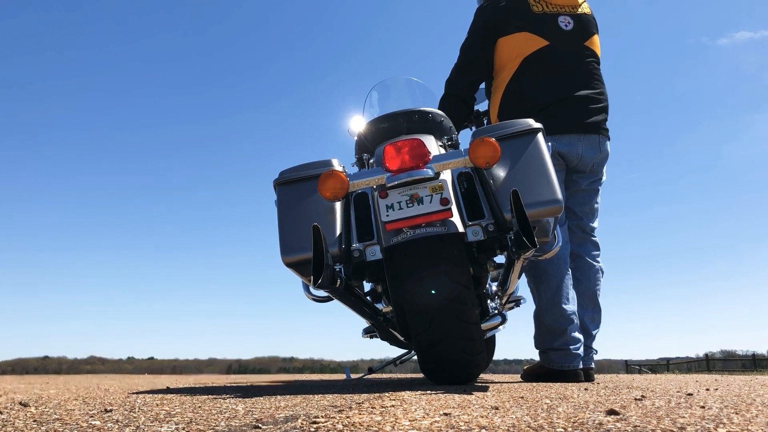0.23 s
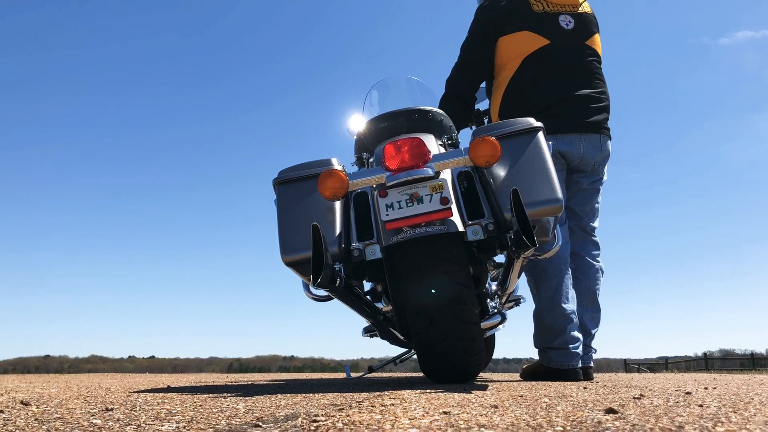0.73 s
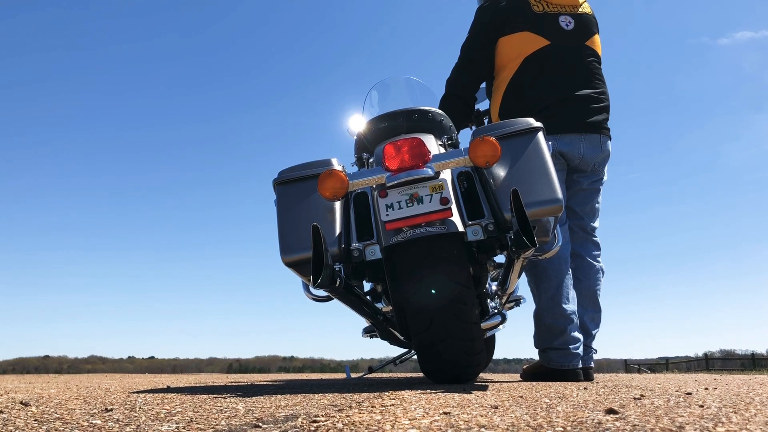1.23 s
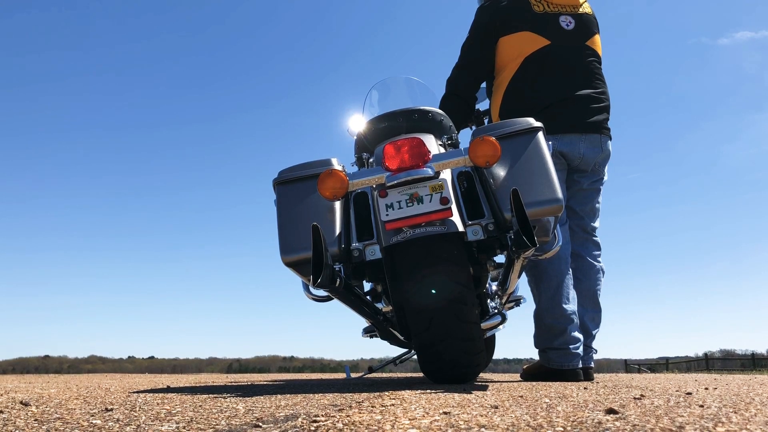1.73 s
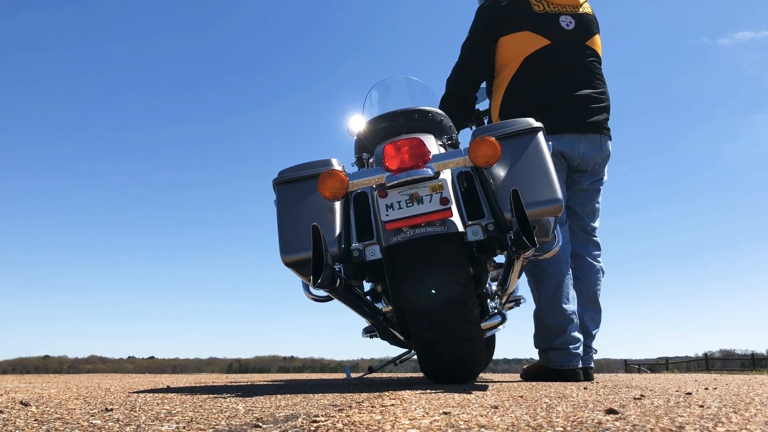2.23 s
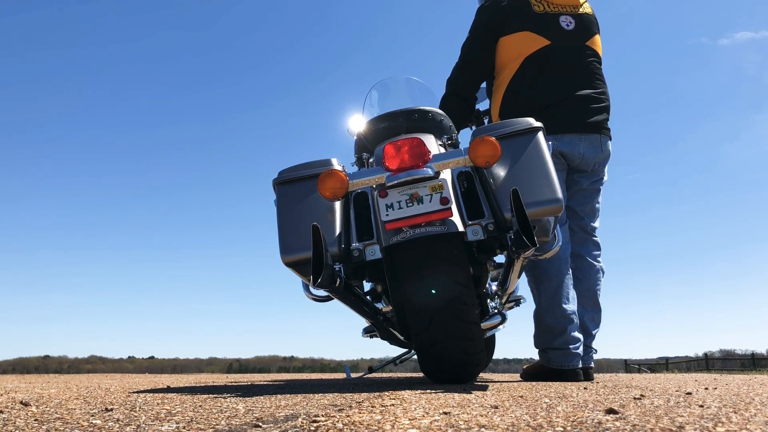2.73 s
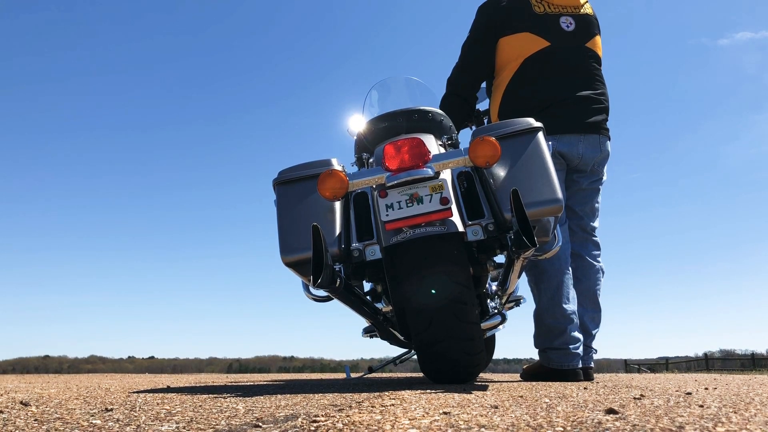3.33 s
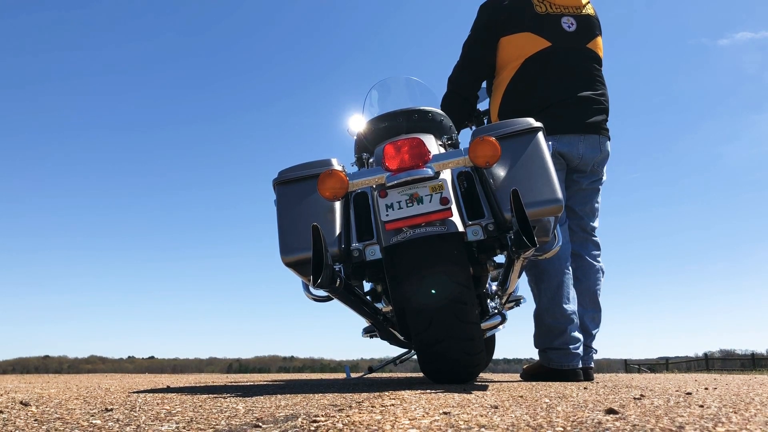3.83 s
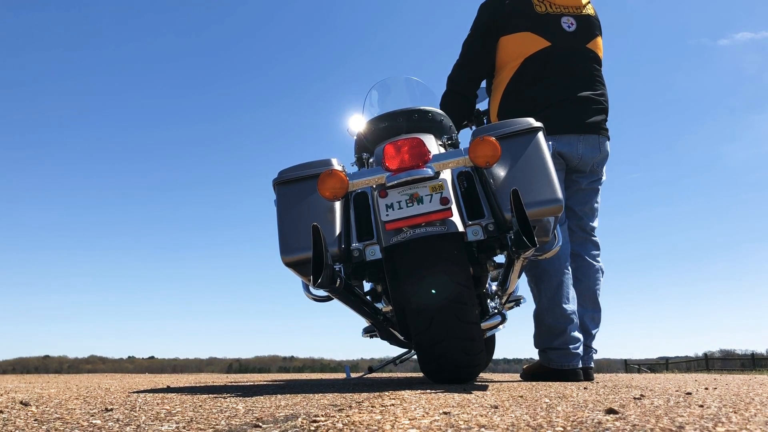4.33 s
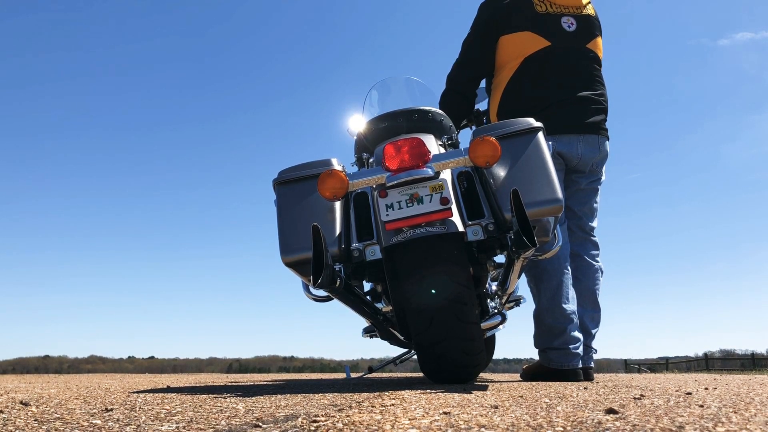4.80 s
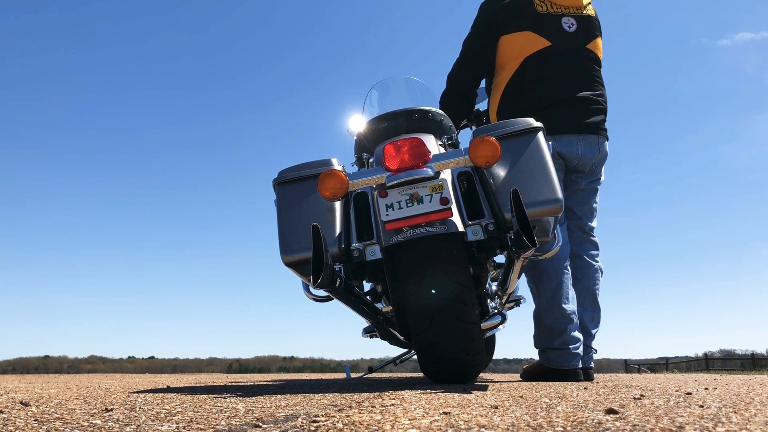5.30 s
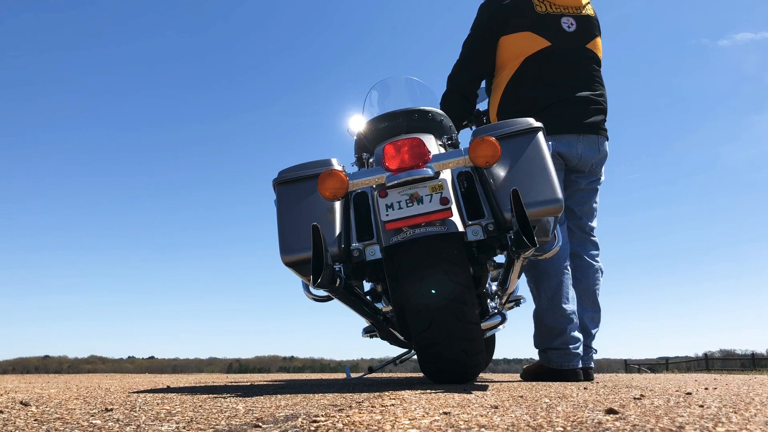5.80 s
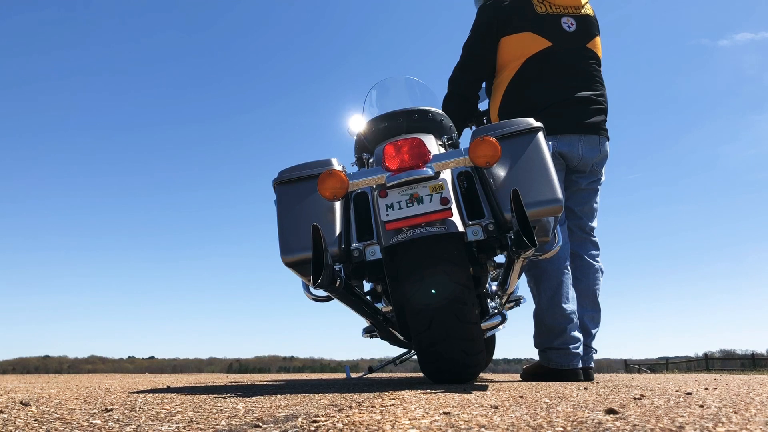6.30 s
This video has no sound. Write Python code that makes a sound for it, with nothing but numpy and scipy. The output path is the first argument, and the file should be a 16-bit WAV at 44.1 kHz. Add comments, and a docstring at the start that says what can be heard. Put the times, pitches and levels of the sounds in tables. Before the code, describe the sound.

A V-twin motorcycle stands in an open lot, heard close behind its loud, open exhaust, with little echo. At 0 s it is already running fast and sagging slightly. Around 0.15 s the throttle snaps open and the engine surges to a rough, raspy peak near 0.45 s. The throttle shuts and the growling pitch slides down steadily, individual barks separating. From about 1.4 to 2.0 s sharp dry pops crackle in the pipe, strongest before 1.55 s, fading as it slows. From 1.75 to 2.7 s it nearly stalls: weak, slack puffs, soft breathy gas rushes, low rumble. Near 2.8 s a few strong firings catch, and a deep loping idle continues to 6.55 s, about eight uneven cycles per second, with thumps, hollow knocks, spitting hiss and faint valve rustle. A weaker firing or two slips by near 4.05 s and 5.95 s. Automatic level control ducks the rev, then slowly lifts the quieter sound.

```python
"""V-twin motorcycle: blip, overrun, idle

Heard close behind the open exhaust. Speed sags, a throttle blip revs the engine, it coasts down popping
almost to a stall, then catches into a loping idle. Each cycle sends four puffs down the pipes: each thumps
the gas column, barks at the outlet and tears into hiss. Gliding tones growl when revved; soft gas rushes
and valve rustle join in. Gain control ducks under the rev, then slowly lets the level back up.
"""
import sys
import numpy as np
from scipy import signal
from scipy.fft import rfft, irfft, next_fast_len
from scipy.io import wavfile
from scipy.ndimage import uniform_filter1d

SR = 44100
rng = np.random.default_rng(int(sys.argv[2]) if len(sys.argv) > 2 else 0)


def int16_out(signal):
    """Quantize to a 16-bit WAV file."""
    q = np.round(np.clip(np.atleast_2d(signal).T, -1, 1) * 32767)
    wavfile.write(sys.argv[1], SR, q.astype(np.int16))


N = 288855
T = np.arange(N) / SR

# Engine speed: (time [s], four-stroke rate [cycles/s])
SPEED = [(0.0, 24.4), (0.13, 23.4), (0.2, 27.3), (0.3, 33.8), (0.4, 42.5), (0.45, 45.2), (0.52, 43.6),
         (0.63, 38.7), (1.0, 31.1), (1.3, 25.5), (1.85, 15.4), (2.5, 8.242), (2.95, 7.781), (3.03, 8.106),
         (4.03, 8.112), (4.04, 7.838), (4.51, 7.52), (5.16, 7.819), (5.6, 7.399), (5.72, 7.746),
         (6.55, 7.724)]
START_CYCLE = -.30
# Throttle: starts to open, starts to close, is shut; opening time
OPEN_S, CLOSING_S, SHUT_S, SNAP_S = .145, 0.332, 0.44, 0.018
# Idle has caught at CATCH_S, after a fade of CATCH_LENGTH_S; it starts weak, full level at SETTLED_S
CATCH_S, CATCH_LENGTH_S = 2.785, 0.078
WEAK_IDLE_DB, SETTLED_S = -1.5, 5.55
# Throttle shut: coasting pattern turns to spinning; firings begin to starve, are fully starved
COAST_CPS, SPIN_CPS, STARVING_CPS, STARVED_CPS = 17, 39, 16.2, 13.1

# Puffs of one cycle, per engine state, before scatter and starved stretch:
# (crest place [cycles], rise [cycles], thump [dB], bark [dB], hiss [dB])
IDLING_PUFFS = [(-.015, 0.041, -6.5, 8, 3), (.255, 0.036, -9, -14, -20), (.412, .034, -3, 6.5, -1),
                (.78, 0.03605, -3, 0, -6.5)]
COASTING_PUFFS = [(-.10, 0.012, -2, -4.5, -1.5), (.2, .03, -15.5, -15, -11), (.26, .012, -3, -0.5, 10),
                  (.57, 0.012, -2, -1, 10)]
SPINNING_PUFFS = [(-.51, 0.034, 4, 8, 0.3), (-.13, 0.028, 16, 4, -0.18), (.09, 0.03, -3.5, 10, -0.62),
                  (.37, 0.015, -3, 4, 0.98)]
PULLING_PUFFS = [(-.40, 0.05, 5, -15, -8), (-.21, 0.041, 3, 11, 14.5), (.23, 0.0406, 1, 11, 12.5),
                 (.42, 0.018, -31, -13, -28)]
# Rich and lean firings, added to the nearest puff: (crest time [s], level change [dB])
ODD_FIRINGS = [(.148, -2.5), (.183, -1.5), (.221, -8), (2.79, 9.5), (2.85, 0), (2.92, 4.5), (4.028, -9.5),
               (4.083, -6), (5.915, -12.5), (5.987, -33)]
# Strength scatter at idle and revved: (thump [dB], bark [dB], hiss [dB])
IDLE_SCATTER_DB, REV_SCATTER_DB = (1.2, 1.8, 2.2), (2.5, 2, 2)

# Exhaust level against speed: (rate [cycles/s], thump [dB], bark [dB], hiss [dB])
LOUDNESS = [(8.25, -18.5, -23.5, -33), (11.2, -15.5, -19.5, -25.5), (16.46, -2, -10.5, -30),
            (20, -5, -4, -14.5), (25.56, -1, 2.5, -6.5), (28.3, 1, 5, 1), (41.4, 3, 9.5, 4)]
# Level change, throttle open: (thump [dB], bark [dB], hiss [dB])
THROTTLE_DB = (-2, 0.4, -0.5)
# Level change, starved: (thump [dB], bark [dB], hiss [dB])
STARVED_DB = (-3.5, -4.5, -11.5)

# Valve rustle in each cycle: (place [cycles], length [cycles], level [dB])
VALVES = [(.21, 0.082, -44.5), (.61, 0.092, -46.5)]
# Valve rustle colour: (frequency [Hz], density [dB per Hz])
VALVE_COLOUR = [(1000, -1), (1800, 8.5), (3500, -6), (6000, 6.5), (9000, -24), (15000, -20)]
# Gas rushes near stall: (start [s], end [s], level [dB]); fade time
RUSHES, RUSH_EDGE_S = [(1.75, 2.037, -27.5), (2.13, 2.21, -31)], 0.029

# Afterfire pops on the overrun: (time [s], relative level [dB])
POPS = [(1.402, -2), (1.4267, -3), (1.446, 5), (1.49, 5), (1.5034, -1), (1.518, 5), (1.5365, -2),
        (1.5522, -4), (1.5849, -6), (1.6007, -6), (1.634, -10), (1.6514, -7), (1.6672, 1), (1.6882, -10),
        (1.705, -1), (1.7448, -7), (1.805, -3), (1.8243, 0), (1.8662, -16), (1.8876, -2), (1.9331, -12),
        (1.9476, -9), (2.0049, -8), (2.035, -17)]
# Pop colour: (frequency [Hz], density [dB per Hz])
POP_COLOUR = [(300, -9), (700, 7), (1200, 4), (1800, 1), (2600, -17), (4000, -20)]
POPPED_DB = -2.5  # change to bark and hiss of a puff near a pop

# Smooth gas pulsation: (multiple of cycle rate, relative level [dB])
PULSATION = [(3, 6.5), (4, -3.5), (5, 6.5), (6, 1.5), (7, -12), (8, -4), (9, 0.5), (10, -2), (11, -3.5),
             (15, -2.5)]
# Pipe response to the pulsation: (frequency [Hz], gain [dB])
GROWL_RESPONSE = [(55, -8), (95, 1), (120, 0), (148, 4), (165, 1), (200, -5), (260, -3), (310, 0),
                  (400, -2.5), (620, -6)]
# Growl level, added to the thump's loudness: (rate [cycles/s], level [dB])
GROWL_LEVEL = [(10, -18), (13, -5), (16, -3), (23, -1.5), (28, 2), (34, 2.5), (39, -1), (44, -3)]

# Hiss colour: (frequency [Hz], density [dB per Hz])
HISS_COLOUR = [(1500, 5), (2600, 5.5), (4000, -0.5), (5500, -2), (8000, -4.5), (11500, -4), (13000, -7),
               (16000, -6)]
# Whistle of each cylinder's jet: (place [cycles], frequency [Hz], width [Hz], boost [dB])
WHISTLES = [(0, 6380, 2000, 5.5), (.42, 11400, 2510, 8)]
# Rate range over which the rasp gains its edge; the edge: (frequency [Hz], width [Hz], boost [dB])
EDGE_CPS = (30, 44)
RASP_EDGE = [(2700, 310, -8), (4700, 700, -2), (7600, 1800, 5.5), (15500, 4000, -7)]
# Outlet cross modes, before each user's depth: (frequency [Hz], width [Hz], boost [dB])
OUTLET = [(670, 85, 0.5), (1633, 27, 5), (2210, 42, -7), (2890, 180, 6.5), (3110, 270, -7),
          (3570, 300, 6.5), (4080, 340, 6.5), (4680, 470, -2), (6400, 2700, -0.5), (7940, 170, 7.5)]
# Bark colour, slow flow: (frequency [Hz], density [dB per Hz])
SLOW_BARK = [(150, -7.5), (320, -4), (400, -6), (600, -0.5), (810, -4), (1000, -8.5), (1800, -15),
             (2500, -23), (3600, -33)]
# Bark colour, fast flow: (frequency [Hz], density [dB per Hz])
FAST_BARK = [(170, -4.5), (300, -0.5), (600, -0.5), (1000, -2), (1500, -4), (1950, -8), (2500, -17.5),
             (3600, -29)]
# Thump colour, fast flow: (frequency [Hz], density [dB per Hz])
FAST_THUMP = [(25, -60), (45, -2.5), (70, -3), (110, -6.5), (155, -8), (240, -8.5), (320, -15.5),
              (500, -29.5)]
# Gas column resonances at idle, each swelling once per cycle:
# (frequency [Hz], width [Hz], relative level [dB], outlet polarity, swell place [cycles], swell depth [dB])
PIPE = [(62.6, 6.1, 1, 1, 1, 2.5), (104, 32, -21.5, -1, 0.19, 22.5), (129.3, 5.7, -12, -1, 0.57, 12),
        (164.6, 6.1, -10.5, -1, 0.059, 7.5), (221.8, 7.2, -17.5, 1, 0.42, 11),
        (316.3, 7.3, -17.5, 1, 0.78, 4)]
# Pipe resonances in hot fast flow: (frequency [Hz], width [Hz], boost [dB])
HOT_PIPE = [(159, 25, 6), (327, 46, 7)]

# Gain control: mean-level ceiling, recovery slope; band limit
LIMIT_DB, RECOVERY_DB_PER_S, EDGE_HZ = -10, 5.5, 16050


def amp(db):
    """Decibels to gain."""
    return 10 ** (np.asarray(db) / 20)


def curve(rows, t=T, axis=1):
    """One table column, linearly interpolated."""
    rows = np.asarray(rows, float)
    return np.interp(t, rows[:, 0], rows[:, axis])


def ramp(x, start, end):
    """Goes from 0 to 1 between two values."""
    return np.clip((x - start) / (end - start), 0, 1)


def drift(count):
    """Slow random curve through unit-variance knots."""
    return np.interp(T, np.linspace(0, T[-1], count), rng.standard_normal(count))


def add(mix, start_s, sound):
    """Mixes a sound in at a time."""
    part = mix[max(round(start_s * SR), 0):][:len(sound)]
    part += sound[:len(part)]


def steady(x, size=5760):
    """Divides a sound by its running RMS."""
    power = uniform_filter1d(uniform_filter1d(x ** 2, size), size)
    return x / np.sqrt(abs(power) + 1e-12)


def colour(x, points, modes=(), depth=1, size=8192):
    """Minimum-phase filter from a spectrum plus resonant bumps."""
    hz = np.fft.rfftfreq(size, 1 / SR)
    f, level = np.transpose(points)
    db = np.interp(np.log(hz + 1), np.log(f), level)
    # 20 dB per octave beyond the end points
    db -= 20 * np.log2(np.maximum(hz / f[-1], 1) * np.maximum(f[0] / (hz + 1), 1))
    db += depth * sum(boost / (1 + (2 * (hz - centre) / width) ** 2) for centre, width, boost in modes)
    log_gain = np.log(amp(np.maximum(db, -90)))
    circle = np.r_[log_gain, log_gain[-2:0:-1]]
    taps = np.fft.ifft(np.exp(np.conj(signal.hilbert(circle)))).real
    return signal.oaconvolve(x, taps[:size // 2])[:N]


def disperse(x, delay_s, hz):
    """Low tones leave the pipe later than high ones, so sounds drop in pitch."""
    size = next_fast_len(N + SR // 10)
    f = np.fft.rfftfreq(size, 1 / SR)
    shift = np.exp(-2j * np.pi * delay_s * hz * (1 - np.exp(-f / hz)))
    return irfft(rfft(x, size) * shift, size)[:N]


def crank():
    """Engine cycles completed: the integral of speed."""
    return START_CYCLE + np.cumsum(curve(SPEED)) / SR


def throttle(t):
    """Snapped open, then rolled shut."""
    return ramp(t, OPEN_S, OPEN_S + SNAP_S) - ramp(t, CLOSING_S, SHUT_S)


def idling(t):
    """1 once the idle has caught."""
    return ramp(t, CATCH_S - CATCH_LENGTH_S, CATCH_S)


def slackness(t=T, at_idle=0.057):
    """Starved firings go slack as the engine slows, until the idle catches."""
    starved = ramp(curve(SPEED, t), STARVING_CPS, STARVED_CPS)
    return starved * (1 - (1 - at_idle) * idling(t))


def loudness(axis):
    """Voice level in dB (1 thump, 2 bark, 3 hiss): speed, throttle, starvation, weak idle start."""
    speed_db = curve(LOUDNESS, curve(SPEED), axis)
    throttle_db = THROTTLE_DB[axis - 1] * throttle(T)
    starved_db = STARVED_DB[axis - 1] * slackness()
    weak_db = WEAK_IDLE_DB * idling(T) * ramp(T, SETTLED_S, CATCH_S)
    return speed_db + throttle_db + starved_db + weak_db


def churning(calm_db=-3.5, pulling_db=-4):
    """Eddy level in dB: lower at moderate speed and with the throttle open, so puffs stand apart."""
    return calm_db * (1 - ramp(curve(SPEED), 28.0, 32.7)) + pulling_db * throttle(T)


def pattern(when, slot):
    """Puff rows: speed, throttle and idle blend the four patterns in turn."""
    rows = np.array(COASTING_PUFFS)[slot]
    spinning = ramp(curve(SPEED, when), COAST_CPS, SPIN_CPS)
    blends = (SPINNING_PUFFS, spinning), (PULLING_PUFFS, throttle(when)), (IDLING_PUFFS, idling(when))
    for table, share in blends:
        rows = rows + share[:, None] * (np.array(table)[slot] - rows)
    return rows


def puffs(slack_scatter_db=5.0, idle_jitter=0.0023, rev_jitter=0.0057, stretch=1.8):
    """Onset s, rise s and three gains per puff; timing (jitter in cycles) and strength scatter."""
    turns = crank()
    cycles = np.repeat(np.arange(np.ceil(turns[-1])), len(IDLING_PUFFS))
    slot = np.arange(len(cycles)) % len(IDLING_PUFFS)
    when = np.interp(cycles + slot / len(IDLING_PUFFS), turns, T)
    idle, slack, rows = idling(when), slackness(when), pattern(when, slot)
    luck = rng.standard_normal((len(cycles), 5))

    jitter = luck[:, 0] * np.interp(idle, [0, 1], [rev_jitter, idle_jitter])
    crest = cycles + rows[:, 0] + jitter
    onset = np.interp(crest - rows[:, 1] * (1 + stretch * slack), turns, T)
    crest_s = np.interp(crest, turns, T)
    rise = crest_s - onset

    scatter_db = np.outer(idle, IDLE_SCATTER_DB) + np.outer(1 - idle, REV_SCATTER_DB)
    scatter_db = scatter_db + slack_scatter_db * slack[:, None]
    # half the variance is shared by the three voices
    db = rows[:, 2:] + scatter_db * (luck[:, 1:2] + luck[:, 2:]) / np.sqrt(2)
    for time_s, odd_db in ODD_FIRINGS:
        db[np.argmin(abs(crest_s - time_s))] += odd_db
    for time_s, _ in POPS:
        db[abs(crest_s - time_s) < .007, 1:] += POPPED_DB
    heard = (onset > 0) & (onset < T[-1])
    return onset[heard], rise[heard], *amp(db[heard]).T


def kicks(onset, gain):
    """A one-sample pressure impulse per event."""
    return np.bincount(np.clip(onset * SR, 0, N).astype(int), gain, N + 1)[:N]


def jet(onset, rise, gain, sharp, size=3000):
    """Turbulence: noise that swells and dies with each puff."""
    strength = np.zeros(N + size)
    for start_s, rise_s, g in zip(onset, rise, gain):
        age = np.arange(size) / SR / max(rise_s, 1 / SR)
        strength[int(start_s * SR):][:size] += g * (age * np.exp(1 - age)) ** sharp
    return strength[:N] * rng.standard_normal(N)


def wake(x, wake_db, t30_s):
    """Eddies churn on after each puff: noise falling 30 dB in t30_s."""
    keep = amp(-60 / (abs(t30_s) * SR))
    power = signal.lfilter([1 - keep], [1, -keep], x ** 2)
    return x + amp(wake_db) * np.sqrt(power) * rng.standard_normal(N)


def flow(db, slack_db):
    """Even noise between the puffs, raised when they go slack."""
    return amp(db + slack_db * slackness()) * rng.standard_normal(N)


def by_speed(slow, fast, slow_cps=9, fast_cps=17):
    """Equal-power crossfade from slow-flow to fast-flow sound, levelled."""
    share = ramp(curve(SPEED), slow_cps, fast_cps)
    return steady(np.sqrt(1 - share) * steady(slow) + np.sqrt(share) * steady(fast))


def flutter(x, patchy_db, whistles=()):
    """Random time-frequency patches flicker the colour; jet whistles boost bands once per cycle."""
    hz, t, z = signal.stft(x, SR, nperseg=256)
    patches = uniform_filter1d(rng.standard_normal(z.shape), size=5, axis=0)
    patches = uniform_filter1d(patches, size=9, axis=1)
    db = patchy_db * patches / patches.std()
    turns = np.interp(t, T, crank())
    for place, centre, width, boost in whistles:
        band = np.exp(-((hz - centre) / width) ** 2)
        swell = np.cos(np.pi * (turns - place)) ** 8
        db = db + boost * np.outer(band, swell)
    return signal.istft(z * amp(db), SR)[1][:N]


def valve_gear(uneven_db=3):
    """Rockers and chain: coloured noise rustling softly in two swells per cycle."""
    turns, level = crank(), 0
    for place, length, db in VALVES:
        distance = (turns - place + .5) % 1 - .5
        level = level + amp(db) * np.exp(-(distance / length) ** 2)
    rustle = colour(rng.standard_normal(N), VALVE_COLOUR, OUTLET)
    return level * amp(uneven_db * drift(count=110)) * steady(flutter(rustle, patchy_db=5.5))


def rushes(depth_db=7.5):
    """Soft gas noise near stall, pumped twice per cycle."""
    level = 0
    for start, end, db in RUSHES:
        fade = ramp(T, start, start + RUSH_EDGE_S) * ramp(T, end, end - RUSH_EDGE_S)
        level = level + amp(db) * fade
    pumping = amp(depth_db * np.cos(2 * np.pi * 2 * crank()))
    return level * pumping * steady(colour(rng.standard_normal(N), HISS_COLOUR))


def pops(level_db=24.5, echo_s=0.0037, echo_db=-11, cooled_db=-11, hot_s=1.57, cool_s=1.7):
    """Unburnt fuel pops in the pipe: shock front, brief ring, echo; the front weakens hot_s to cool_s."""
    when, db = np.transpose(POPS)
    shocks = kicks(when, amp(db)) + kicks(when + echo_s, amp(db + echo_db))
    ring = colour(wake(shocks, wake_db=-13, t30_s=0.03), POP_COLOUR)
    ring = disperse(ring, delay_s=0.0017, hz=1200)
    front = colour(wake(shocks, wake_db=6, t30_s=0.008), HISS_COLOUR)
    front = front * amp(-13 + cooled_db * ramp(T, hot_s, cool_s))
    return amp(level_db) * (ring + front)


def growl(waver_db=4.5):
    """Gas pulsation: sines at multiples of the cycle rate, wavering, shaped by pipe resonances."""
    turns, tones = crank(), 0
    for order, db in PULSATION:
        level = amp(db + waver_db * drift(count=40))
        tones = tones + level * np.sin(2 * np.pi * (round(order) * turns + rng.random()))
    level_db = curve(GROWL_LEVEL, curve(SPEED)) + loudness(axis=1)
    return steady(colour(tones, GROWL_RESPONSE)) * amp(level_db)


def hiss(onset, rise, gain):
    """Jet tears at the outlet: spit when slow, rasp when revved, bright edge at top speed."""
    gas = steady(jet(onset, rise, gain, sharp=4.0)) + flow(db=-19.0, slack_db=12)
    spit = colour(wake(gas, wake_db=-14.5, t30_s=0.3), HISS_COLOUR, OUTLET)
    slow = flutter(spit, patchy_db=3.5, whistles=WHISTLES)
    torn = wake(gas, wake_db=1 + churning(), t30_s=0.013)
    edge = ramp(curve(SPEED), *EDGE_CPS)
    plain = colour(torn, HISS_COLOUR, OUTLET, depth=0.043)
    rasp = (1 - edge) * plain + edge * colour(torn, HISS_COLOUR, RASP_EDGE)
    return by_speed(slow, flutter(rasp, patchy_db=1.5)) * amp(loudness(axis=3))


def knocks(onset, gain, hz=745, spread=0.055, swell_s=0.0038, sharp=3.5,
           lead_s=0.0024, echo_s=0.00585, echo_db=-9):
    """Outlet rings hollow for a few periods, pitch varying per puff; the pipe returns an echo."""
    t, out = T[:SR // 40], np.zeros(N + SR)
    swell = (t / swell_s * np.exp(1 - t / swell_s)) ** sharp
    for start_s, g, luck in zip(onset, gain, rng.standard_normal(len(onset))):
        ring = g * swell * np.sin(2 * np.pi * hz * (1 + spread * luck) * (t - lead_s))
        add(out, start_s - lead_s, ring)
        add(out, start_s - lead_s + echo_s, amp(echo_db) * ring)
    return steady(out[:N])


def bark(onset, rise, gain, lag=0.3526, rough_db=1, knock_db=-3.5):
    """Steep wave front (lag in rises) plus rough gas at the outlet; slow puffs also knock."""
    front = steady(kicks(onset + lag * rise, gain))
    rough = amp(rough_db) * steady(jet(onset, rise, gain, sharp=1.0))
    gas = front + rough + flow(db=-7.5, slack_db=7)
    slow = steady(colour(wake(gas, wake_db=-1, t30_s=0.72), SLOW_BARK, OUTLET))
    slow = slow + amp(knock_db) * (1 - slackness()) * knocks(onset, gain)
    fast = colour(wake(gas, wake_db=0.5 + churning(), t30_s=0.027), FAST_BARK, OUTLET, depth=0.2)
    fast = disperse(fast, delay_s=0.003936, hz=809)
    return by_speed(slow, fast) * amp(loudness(axis=2))


def thump(onset, rise, gain, churn_db=-21, rumble_db=-19, top_hz=420, revved_db=-7, level_db=4.0):
    """Kicks ring the gas column; its resonances swell in turn, which makes the lope."""
    churn = steady(jet(onset, 2 * rise, gain, sharp=0.99))
    push = steady(kicks(onset, gain)) + amp(churn_db) * churn
    t, turns, ringing = T[:SR // 2], crank(), np.zeros(N)
    for hz, width, db, side, place, swell_db in PIPE:
        ring = np.sign(side) * np.exp(-np.pi * width * t) * np.cos(2 * np.pi * hz * t)
        swell = amp(db + swell_db * np.cos(2 * np.pi * (turns - place)))
        ringing += signal.oaconvolve(push, ring)[:N] * swell
    soften = signal.butter(4, top_hz, fs=SR, output="sos")
    rumble = steady(colour(rng.standard_normal(N), FAST_THUMP, HOT_PIPE))
    boom = steady(signal.sosfilt(soften, ringing)) + amp(rumble_db) * rumble
    drone = colour(push, FAST_THUMP, HOT_PIPE)
    voice_db = level_db + loudness(axis=1) + revved_db * ramp(curve(SPEED), 13.4, 15.5)
    return by_speed(boom, drone, slow_cps=12.4, fast_cps=30.7) * amp(voice_db)


def scene():
    """Three exhaust voices share the same puffs; the other layers join them."""
    onset, rise, thumps, barks, hisses = puffs()
    background = valve_gear() + rushes() + pops() + growl()
    exhaust = hiss(onset, rise, hisses) + bark(onset, rise, barks) + thump(onset, rise, thumps)
    return (background + exhaust)[None]


def gain_control(x, size=4410):
    """Holds the mean level under LIMIT_DB; gain recovers at a fixed slope."""
    power_db = 10 * np.log10(abs(uniform_filter1d(x[0] ** 2, size)) + 1e-12)
    recovered = RECOVERY_DB_PER_S * T
    held_db = np.maximum.accumulate(power_db + recovered) - recovered
    return x / amp(uniform_filter1d(np.maximum(held_db - LIMIT_DB, 0), size))


def record(dry, ceiling=0.75):
    """Gain control, soft peak rounding, band limit."""
    ducked = gain_control(dry)
    rounded = ducked / (1 + (ducked / ceiling) ** 6) ** (1 / 6)
    lowpass = signal.firwin(401, EDGE_HZ, window=("kaiser", 8), fs=SR)
    return signal.oaconvolve(rounded, lowpass[None], "same")


dry = scene()
out = record(dry)
int16_out(out)
```